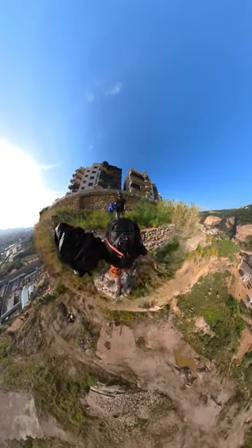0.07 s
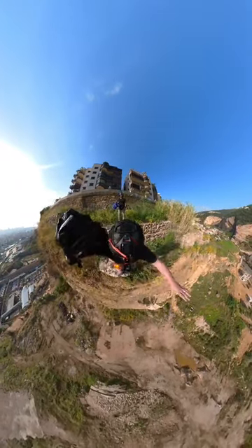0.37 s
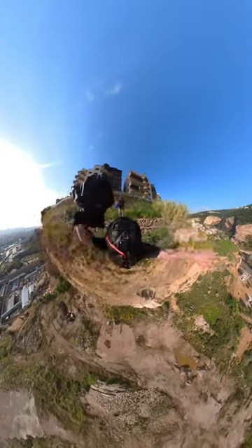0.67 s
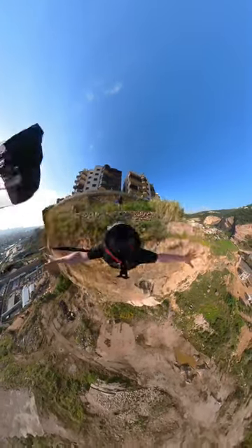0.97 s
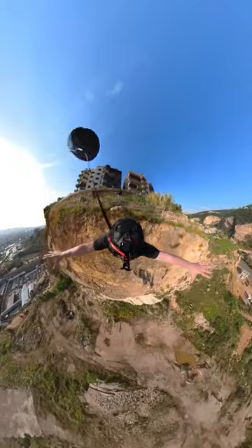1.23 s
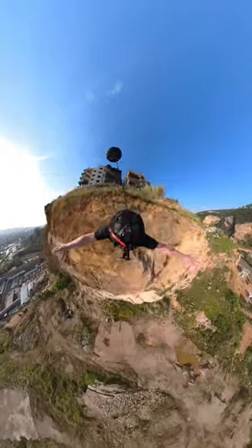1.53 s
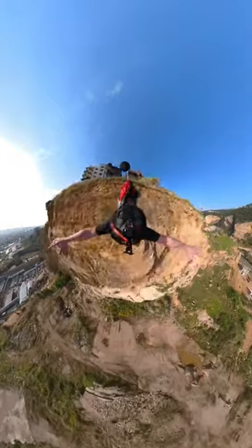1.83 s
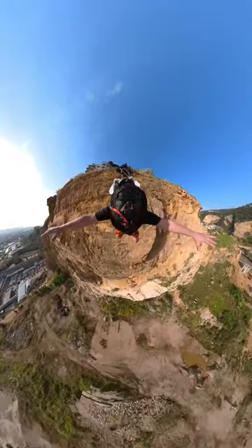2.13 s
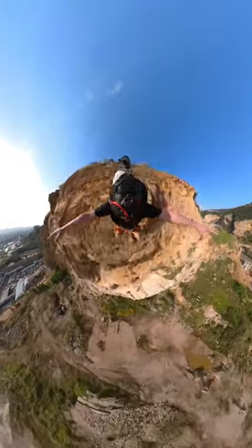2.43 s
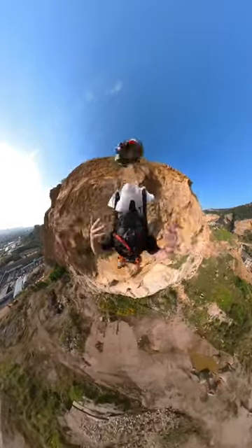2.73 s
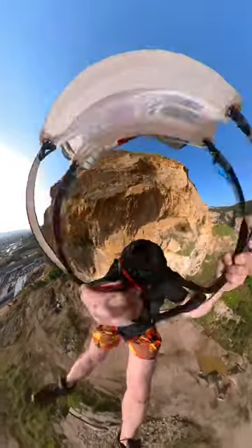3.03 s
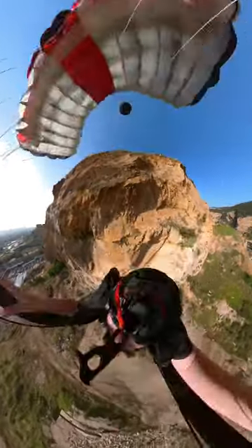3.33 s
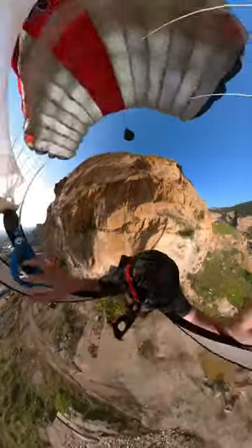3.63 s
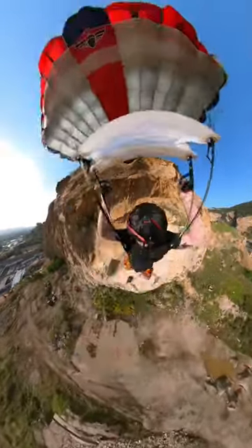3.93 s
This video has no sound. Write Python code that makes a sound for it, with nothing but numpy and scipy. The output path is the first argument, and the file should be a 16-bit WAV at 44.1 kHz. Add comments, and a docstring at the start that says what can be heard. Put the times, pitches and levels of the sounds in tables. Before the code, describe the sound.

Wind rumbles and thumps on a close microphone, growing stronger over the first second. Nylon rustles and gear clicks from about 0.4 to 1.2 seconds. From 1.5 seconds a faint wavering whistle rides on the buffeting. A line squeaks softly at 2.8, then a parachute opens in a burst of cracks and flutter from 2.9 to 3.3, flaps a few times and flutters again from 3.7, under continuing gusts.

```python
"""Wind buffets the helmet microphone of a jumper falling from a cliff, harder as the fall speeds up.
A hand-held pilot chute rustles and is thrown, a line squeaks, and the canopy cracks open in a burst
of flutter, flaps a few times and flutters again overhead. The wind is rumbling noise with thumps from
single eddies; the cloth is a spray of tiny cracks and short pops. Behind them the air rushes past
and sings faintly on the gear as it sheds vortices."""
import sys
import numpy as np
from scipy import signal
from scipy.fft import rfft, irfft
from scipy.io import wavfile
from scipy.ndimage import uniform_filter1d, minimum_filter1d

SR = 44100
rng = np.random.default_rng(int(sys.argv[2]) if len(sys.argv) > 2 else 0)


def output_pcm(signal):
    """Save a mono or channel-first signal as 16-bit PCM at the path in sys.argv[1].

    Samples are clipped to [-1, 1] before scaling.
    """
    pcm = np.clip(np.atleast_2d(signal).T, -1, 1) * 32767
    wavfile.write(sys.argv[1], SR, np.round(pcm).astype(np.int16))


N = 176400
T = np.arange(N) / SR
FREQS = np.maximum(np.fft.rfftfreq(N, 1 / SR), 1)

# Fader rides. Each row: time in seconds, level in dB.
BUFFET_RIDE = [(0, -33.5), (.06, -40), (.13, -35), (.27, -43), (.45, -36), (.54, -34.5), (.7, -30.5),
               (.8, -24.5), (.84, -34), (.88, -29), (1.02, -24.5), (1.11, -37), (1.17, -23.5), (1.3, -26.5),
               (1.38, -26), (1.42, -27), (1.5, -23.5), (1.75, -22.5), (1.95, -23.5), (2.03, -22.5),
               (2.11, -24.5), (2.2, -26), (2.35, -23), (2.55, -24.5), (2.88, -24), (3.0, -29.5),
               (3.13, -25), (3.22, -24.5), (3.28, -22.5), (3.35, -25.5), (3.48, -22.5), (3.58, -36),
               (3.72, -23), (3.81, -38.5), (3.87, -20.5), (4, -26)]  # turbulence at the microphone
RUSTLE_RIDE = [(.3, -79), (.425, -65), (.438, -54), (.52, -64.5), (.55, -59.5), (.6, -58), (.625, -55),
               (.685, -52), (.696, -39), (.725, -50), (.742, -56), (.78, -54), (.8, -50), (.87, -52),
               (.975, -45.5), (.986, -34), (1.02, -41), (1.06, -37), (1.075, -33), (1.105, -42),
               (1.128, -45), (1.15, -42), (1.19, -50), (1.22, -58.5), (1.32, -75)]  # the pilot chute's nylon rubbing
RUSH_RIDE = [(0, -43.5), (.6, -42), (1.15, -46), (1.32, -51), (1.52, -44.5), (1.8, -46), (2.15, -51),
             (2.35, -48.5), (2.6, -46), (2.85, -41.5), (3.2, -52.5), (3.6, -49.5), (4, -62)]  # smooth airstream
HISS_RIDE = [(1.42, -87.5), (1.54, -78.5), (1.9, -78), (2.6, -79), (2.8, -65.5), (3.03, -67.5),
             (3.35, -79.5), (3.68, -83.5), (3.84, -72), (4, -95)]  # thin hiss at the microphone port
# Gusts hitting the port. Each row: start in seconds, hold in seconds, level in dB, high cut in Hz.
GUST_HITS = [(0.636, 0.018, -29, 398), (0.947, 0.0067, -18.5, 430), (0.951, 0.022, -29.5, 413),
             (0.977, 0.054, -26, 890), (1.052, 0.071, -35, 850), (1.153, 0.025, -31, 674),
             (1.201, 0.019, -23.5, 972), (1.237, 0.029, -28.5, 950), (1.62, 0.0059, -29, 730),
             (2.038, 0.016, -26.5, 580), (2.75, 0.26, -27, 357), (3.448, 0.0084, -24, 630),
             (3.553, 0.059, -34, 518), (3.835, 0.05, -25.5, 530)]
# Thumps of single large eddies. Each row: centre time in seconds, level in dB, pitch in Hz.
EDDY_THUMPS = [(0.65, -15, 60), (0.812, -14, 80), (0.867, -15, 63.4), (.957, -24, 430), (1.171, -21, 70),
               (1.214, -16, 260), (1.281, -15, 410), (1.405, -31, 550), (1.636, -21, 420),
               (1.721, -30, 490), (2.015, -8, 90), (2.07, -10, 150), (2.853, -6.5, 150), (2.886, -19, 430),
               (2.935, -20.5, 190), (3.158, -9, 170), (3.214, -9, 80), (3.391, -12.5, 250),
               (3.455, -13, 90), (3.851, -28.5, 130), (3.885, -20.5, 90)]
# Bursts of canopy flutter. Each row: start, attack and hold in seconds, level in dB,
# low cut and high cut in Hz.
FLUTTER_BURSTS = [(2.928, .005, 0.037, -29, 248, 2000), (2.946, 0.0034, 0.06, -22, 242, 2850),
                  (3.018, 0.0067, 0.075, -27, 254, 2720), (3.042, 0.027, 0.025, -21.5, 547, 1560),
                  (3.08, 0.0087, 0.037, -23, 444, 1270), (3.116, 0.0028, 0.035, -27.5, 222, 2580),
                  (3.166, 0.0035, 0.035, -34, 350, 980), (3.185, .01, 0.17, -38.5, 222.7, 1690),
                  (3.41, 0.012, 0.12, -43, 298, 820), (3.714, 0.022, 0.024, -27, 196, 1060),
                  (3.745, 0.0063, 0.054, -26.5, 171, 1330), (3.815, 0.021, 0.026, -33.5, 680, 1584),
                  (3.848, 0.0097, 0.032, -28.5, 350, 1280), (3.898, 0.008, 0.059, -33, 220, 1010),
                  (3.977, 0.0043, 0.074, -28.5, 254, 750)]
# Single flaps of cloth; the first row, at 1.207 s, is instead the sharp front of a gust striking the port. Each
# row: time in seconds, pop level in dB, pop pitch in Hz, ring time in seconds, crack level in dB.
CLOTH_FLAPS = [(1.207, -18, 560, 0.00091, -60), (1.263, -32, 750, 0.00084, -56),
               (1.53, -34.5, 865, 0.0028, -38), (2.934, -21, 600, .0006, -37),
               (2.95, -20, 800, 0.00053, -29), (2.97, -17.5, 700, 0.00058, -29),
               (2.984, -20.5, 1500, 0.00089, -25), (3.056, -13.5, 680, 0.0014, -28),
               (3.096, -21, 520, 0.0012, -40), (3.126, -26, 1500, 0.00053, -30),
               (3.154, -23.5, 600, 0.00072, -34), (3.2, -39, 1390, 0.00081, -25),
               (3.237, -20, 636, 0.00096, -31), (3.246, -25, 1080, 0.0015, -42),
               (3.254, -28.5, 1240, .0011, -38), (3.282, -26.5, 1080, 0.00058, -33),
               (3.287, -36.5, 1840, 0.00063, -40), (3.303, -19, 1094, 0.0012, -31),
               (3.335, -32.5, 1310, 0.0013, -44), (3.341, -39, 1390, 0.00083, -46),
               (3.388, -27, 888, 0.00047, -50), (3.413, -26.5, 546, 0.00064, -51),
               (3.444, -36, 1380, 0.00036, -36.5), (3.477, -40, 690, 0.00079, -57),
               (3.495, -21, 563, 0.0012, -52.5), (3.51, -22.5, 670, 0.00075, -48.5),
               (3.542, -26, 460, 0.00075, -60), (3.64, -18.5, 446, 0.00096, -58),
               (3.682, -26.5, 456, 0.00066, -61), (3.709, -18, 530, 0.0009, -54),
               (3.79, -17.5, 760, 0.00064, -49), (3.915, -33.5, 700, 0.00041, -55),
               (3.938, -19.5, 405, 0.00087, -66)]
# Buckles and stiff nylon ticking. Each row: start in seconds, level in dB, low cut and high cut in Hz.
GEAR_TICKS = [(0.093, -33, 2900, 9500), (.432, -55, 2000, 6000), (0.566, -45, 2000, 5500),
              (.621, -48, 2500, 6000), (0.694, -52, 1800, 6000), (0.742, -39, 2000, 6500),
              (0.798, -48, 1800, 6000), (0.967, -39, 1500, 6050), (1.033, -39.5, 1500, 6000),
              (1.072, -26, 2000, 6550), (1.529, -42, 900, 2980), (1.677, -47.5, 1300, 2580),
              (1.749, -49, 1300, 3000), (2.791, -60, 3800, 5630)]
# Gliding tones. Each row: time in seconds, pitch in Hz, level in dB.
LINE_CHIRP = [(2.03, 3970, -91), (2.047, 4130, -76), (2.063, 4300, -77), (2.08, 4360, -84)]  # a line slipping as it pays out
LINE_SQUEAK = [(2.785, 4220, -99), (2.795, 4290, -53.5), (2.82, 4280, -55), (2.842, 4267, -53.5),
               (2.868, 3980, -54.5), (2.905, 4170, -65), (2.925, 4000, -93)]  # a line pulling tight
GEAR_SINGING = [(1.55, 400, -59), (1.66, 445, -37.5), (1.78, 505, -42.5), (1.85, 555, -43),
                (1.94, 560, -36.5), (2.12, 614, -57), (2.19, 595, -53), (2.29, 553, -38),
                (2.42, 573, -48.5), (2.53, 535, -44.5), (2.62, 577, -51), (2.73, 515, -45),
                (2.82, 520, -44), (2.93, 475, -44)]  # the low voice of air on the gear
GEAR_WHISTLE = [(1.9, 1120, -69), (2.0, 1144, -59), (2.12, 1197, -60), (2.24, 1178, -56), (2.32, 1080, -53),
                (2.43, 1142, -52.5), (2.55, 1096, -64), (2.66, 1177, -54), (2.76, 1012, -52),
                (2.83, 1080, -47), (2.92, 950, -55)]  # its higher voice
CORD_WHISTLE = [(1.3, 2780, -73), (1.4, 2820, -68.5), (1.52, 2850, -72), (1.6, 2800, -78),
                (1.72, 2700, -63.5), (1.85, 2700, -74.5), (2.0, 2620, -75)]  # a cord in the airstream
# EQ curves that give each noise its character. Each row: frequency in Hz, relative gain in dB.
BUFFET_EQ = [(15, -36.5), (28, -10), (48, -1), (85, -1), (150, -5), (250, -13.5), (400, -23), (700, -38),
             (1500, -55), (4000, -93.5)]  # deep rumble
FLUTTER_EQ = [(50, -7), (180, 4.5), (350, 4), (650, 0), (900, -6), (1250, -8.5), (2000, -14.5), (3100, -21),
              (4200, -13.5), (6000, -30.5), (9000, -55.5)]  # low-mid body of whipping cloth
RUSTLE_EQ = [(300, -8), (900, 8.5), (2200, 3), (3300, 1.5), (3900, -1.5), (4600, -0.5), (5400, -3.5),
             (6800, -7), (8200, -20.5), (9500, -38.5), (12000, -54)]  # papery nylon
TICK_EQ = [(1000, 8.5), (2400, 6), (3300, 0.5), (4700, 4), (6800, 2), (8200, -20.5), (10000, -37.5)]  # crisp clicks
RUSH_EQ = [(100, 1.5), (300, -0.5), (520, -3), (750, 0), (1050, -4.5), (1600, -11.5), (2700, -21),
           (3700, -33), (5000, -49), (9000, -62), (12000, -71)]  # soft, dark air
HISS_EQ = [(3000, -28), (5200, -10.5), (6600, 4.5), (7900, 3), (8700, -11.5), (10000, -34.5)]  # narrow band of treble

EDDY_SPLIT_HZ, CLUMP_DB, SWELL_DB = 248, 2, 0.5
SMALL_EDDY_DB, FULL_BUFFET_DB = -8, -20  # the small eddies' trim when the ride is at full buffet
GUST_ATTACK_S, RELEASE_S = 0.028, 0.012
CLOTH_SPLIT_HZ, CLOTH_TREBLE_DB = 3300, -17
CRACK_DECAY_S, CRACK_TOP_HZ = 0.0006, 2510
RUSTLE_SPLIT_HZ, RUSTLE_SHIFT_DB = 3600, 2.5
TICK_DECAY_S, TICK_TAIL_S, TICK_TAIL_DB, TICK_TOP_HZ = 0.0013, 0.025, -25, 7800


def buffeting():
    """Rumble of turbulence; small eddies grow with the flow and ride in clumps on the large ones."""
    ride_db = curve(BUFFET_RIDE)
    large = cut(even(eq(noise(), BUFFET_EQ), 0.055), EDDY_SPLIT_HZ)
    small = cut(eq(noise(), BUFFET_EQ), EDDY_SPLIT_HZ, "high")
    clumps = unit(cut(np.abs(large), 78))
    small = unit(small * undb(CLUMP_DB * np.minimum(clumps, 4.5)))
    small_gain = undb(SMALL_EDDY_DB + ride_db - FULL_BUFFET_DB)
    return (large + small_gain * small) * undb(ride_db + SWELL_DB * drift(22))


def gusts():
    """Brief, gritty spells of harder turbulence on the microphone port."""
    out = np.zeros(N)
    for start, hold, db, high_hz in GUST_HITS:
        swirl = cut(grains(1500, 3.8), high_hz, order=6)
        swirl = cut(cut(swirl, 160, order=1), 120, "high", order=2)  # weight in the upper bass
        out += undb(db) * even(unit(swirl), 0.031) * burst(start, hold, GUST_ATTACK_S)
    return out


def eddies():
    """Each large eddy lands as one thump: a dip in pressure between two smaller crests."""
    out = np.zeros(N)
    for centre, db, hz in EDDY_THUMPS:
        offset_squared = np.minimum((np.pi * hz * (T - centre)) ** 2, 20)
        out -= undb(db) * (1 - 2 * offset_squared) * np.exp(-offset_squared)
    return out


def canopy():
    """Cloth whips in dense volleys of small cracks and in single flaps, each a crack and a short pop."""
    cloth = np.zeros(N)
    for start, attack, hold, db, low_hz, high_hz in FLUTTER_BURSTS:
        crackle = (grains(1500, 4.2) + 0.38 * noise()) * undb(2.7 * drift(120))
        flutter = cut(eq(crackle, FLUTTER_EQ), high_hz, order=3)
        flutter = cut(flutter, low_hz, "high", order=1)
        cloth += undb(db) * even(unit(flutter), 0.022) * burst(start, hold, attack)
    for time, pop_db, hz, ring, crack_db in CLOTH_FLAPS:
        progress = np.clip((T - time) / ring + 1, 0, 30)  # the pop's envelope crests on the crack
        pop = progress * np.exp(1 - progress) * np.sin(2 * np.pi * hz * (T - time))
        cloth += undb(pop_db) * pop + undb(crack_db) * crack(time)
    body = cut(cloth, CLOTH_SPLIT_HZ, order=8)
    treble = cut(cloth, CLOTH_SPLIT_HZ, "high")
    return body + undb(CLOTH_TREBLE_DB) * treble


def crack(start):
    """The sharp edge of a flap: a puff of noise that dies at once."""
    age = T - start
    envelope = (age >= 0) * np.exp(-np.minimum(np.abs(age) / CRACK_DECAY_S, 20))
    puff = even(unit(cut(noise(), CRACK_TOP_HZ)), 0.0019) * envelope
    return cut(cut(puff, CLOTH_SPLIT_HZ), 600, "high", order=2)


def pilot_chute():
    """Nylon rubs and crinkles over a sliding hiss, now duller, now brighter."""
    crinkles = eq(.7 * grains(900, 4) + noise(), RUSTLE_EQ)
    dull = cut(crinkles, RUSTLE_SPLIT_HZ, order=3) * undb(RUSTLE_SHIFT_DB * drift(50))
    bright = cut(crinkles, RUSTLE_SPLIT_HZ, "high", order=3) * undb(RUSTLE_SHIFT_DB * drift(50))
    return unit(dull + bright) * undb(curve(RUSTLE_RIDE)) * gate(RUSTLE_RIDE)


def gear_ticks():
    """Buckles and stiff nylon tick: a dry click with a faint tail."""
    out = np.zeros(N)
    for start, db, low_hz, high_hz in GEAR_TICKS:
        age = np.clip(T - start, 0, .4)
        envelope = np.exp(-age / TICK_DECAY_S) + undb(TICK_TAIL_DB) * np.exp(-age / TICK_TAIL_S)
        band = cut(cut(eq(noise(), TICK_EQ), low_hz, "high"), high_hz, order=2)
        click = (T >= start) * envelope * even(unit(band), 0.0035)
        out += undb(db) * cut(click, TICK_TOP_HZ)
    return out


def line_squeak(glide):
    """A line slips or tightens with a nearly pure, jittery squeak that slides in pitch."""
    phase = glide_phase(glide, wobble=0.0054, rate_hz=250)
    tone = np.sqrt(2) * (np.sin(phase) + undb(-24) * np.sin(2 * phase))
    return tone * undb(curve(glide, column=2) + 1.1 * drift(120)) * gate(glide)


def vortex_tone(glide, wobble):
    """Vortices shed from the gear sing a wavering note; the turbulence frays it."""
    phase = glide_phase(glide, wobble, rate_hz=33)
    fray = drift(40) * np.sin(phase) + drift(40) * np.cos(phase)
    return (.85 * np.sin(phase) + .28 * fray) * undb(curve(glide, column=2)) * gate(glide)


def airstream():
    """A smooth bed of rushing air, with a thin hiss on top once the fall is fast."""
    rush = unit(eq(noise(), RUSH_EQ)) * undb(curve(RUSH_RIDE) + 1.5 * drift(21))
    hiss = unit(eq(noise(), HISS_EQ)) * undb(curve(HISS_RIDE) + 2.4 * drift(43))
    return rush + hiss * gate(HISS_RIDE)


def undb(db):
    """Decibels to gain."""
    return 10 ** (np.asarray(db) / 20)


def unit(x):
    """Scale to a standard deviation of 1."""
    return x / (np.std(x) + 1e-12)


def curve(table, column=1):
    """Automation: one column of a table, joined by straight ramps in time."""
    rows = np.array(table)
    return np.interp(T, rows[:, 0], rows[:, column])


def gate(table):
    """Open from a table's first row to its last."""
    return (T >= table[0][0]) & (T <= table[-1][0])


def burst(start, hold, attack):
    """Envelope: a ramp centred on the start, a hold and an exponential release."""
    rise = np.clip((T - start) / attack + .5, 0, 1)
    return rise * np.exp(-np.maximum(T - start - hold, 0) / RELEASE_S)


def glide_phase(glide, wobble, rate_hz):
    """Phase of a gliding tone whose pitch wavers by the fraction `wobble`."""
    hz = curve(glide) * (1 + wobble * drift(rate_hz))
    return 2 * np.pi * np.cumsum(hz) / SR


def eq(x, points):
    """Minimum-phase EQ through the given points, so clicks have no pre-ring."""
    hz, db = np.array(points).T
    gain = undb(np.interp(np.log(FREQS), np.log(hz), db))
    cepstrum = irfft(np.log(gain), N)
    cepstrum[1:N // 2] *= 2
    cepstrum[N // 2 + 1:] = 0
    return irfft(rfft(x) * np.exp(rfft(cepstrum)), N)


def cut(x, hz, kind="low", order=4):
    """Low-pass or high-pass."""
    return signal.sosfilt(signal.butter(order, hz, kind, fs=SR, output="sos"), x)


def even(x, seconds):
    """Leveller: hold the rms near 1 over a sliding window."""
    return x / np.sqrt(uniform_filter1d(x * x, max(int(seconds * SR), 2)) + 1e-9)


def noise():
    """White noise."""
    return rng.standard_normal(N)


def drift(rate_hz):
    """Smooth random modulation with a spread of 1."""
    return unit(irfft(rfft(noise()) * np.exp(-(FREQS / rate_hz) ** 2), N))


def grains(per_second, spread_db):
    """Crackle: tiny random impulses of scattered size."""
    impulses = (rng.random(N) < per_second / SR) * np.sign(noise())
    return unit(impulses * undb(spread_db * np.clip(noise(), -2, 2)))


def scene():
    """Wind and cloth in mono, close to the microphone in open air."""
    wind = buffeting() + gusts() + eddies() + airstream()
    singing = vortex_tone(GEAR_SINGING, wobble=0.0039)
    whistles = vortex_tone(GEAR_WHISTLE, wobble=0.003) + vortex_tone(CORD_WHISTLE, wobble=0.0057)
    lines = line_squeak(LINE_CHIRP) + line_squeak(LINE_SQUEAK)
    parachute = pilot_chute() + gear_ticks() + canopy()
    return (wind + singing + whistles + lines + parachute)[None]


def record(dry):
    """A limiter holds down the largest blows, then a steep low-pass takes off the top."""
    ceiling, top_hz = undb(-10.5), 9500
    window = SR // 200  # 5 ms
    gain = np.minimum(1, ceiling / (np.abs(dry) + 1e-9))
    gain = minimum_filter1d(gain, 2 * window)
    gain = uniform_filter1d(uniform_filter1d(gain, window), window)
    return signal.sosfilt(signal.ellip(8, .2, 70, top_hz, fs=SR, output="sos"), dry * gain)


dry = scene()
out = record(dry)
output_pcm(out)
```